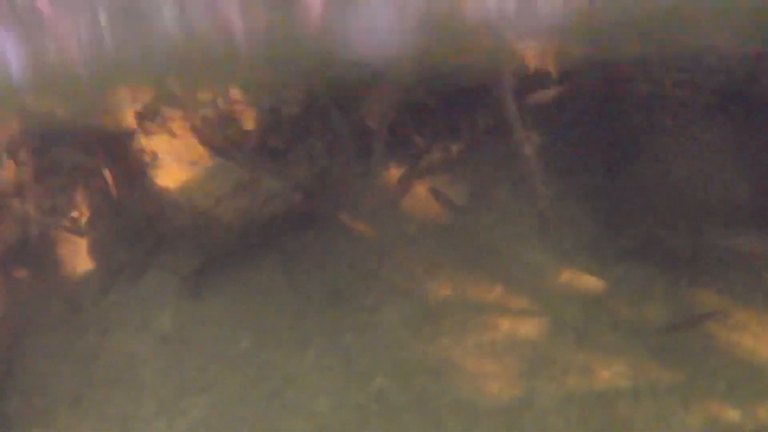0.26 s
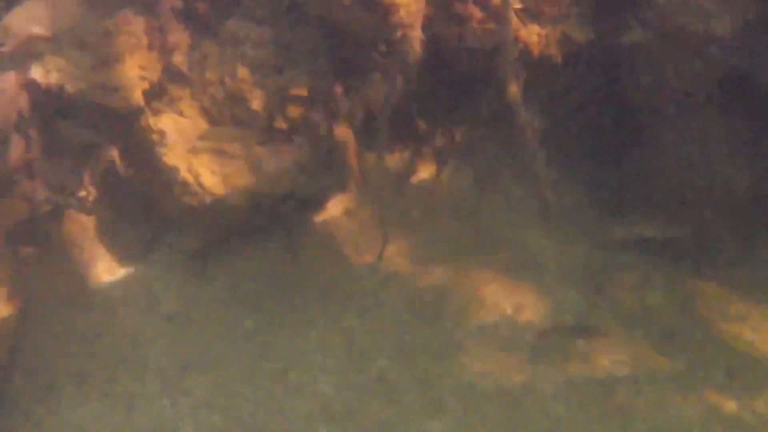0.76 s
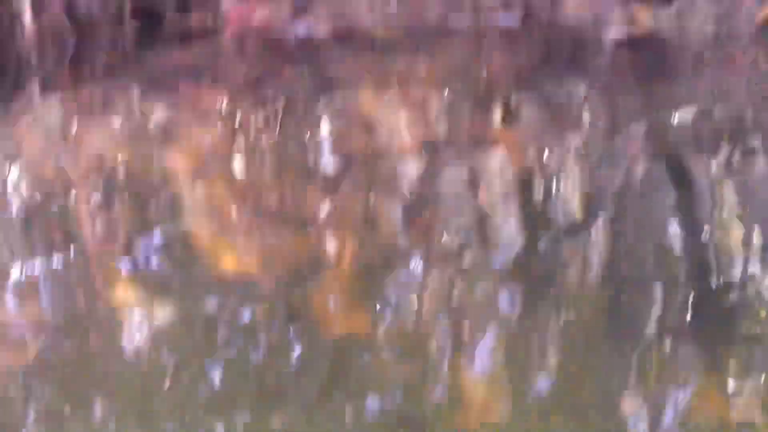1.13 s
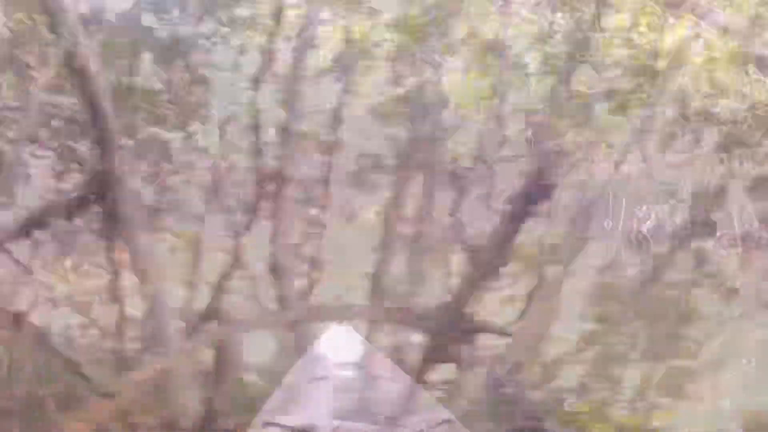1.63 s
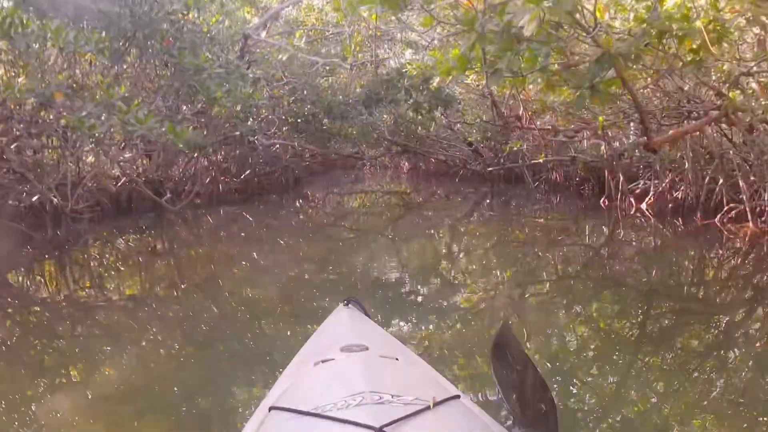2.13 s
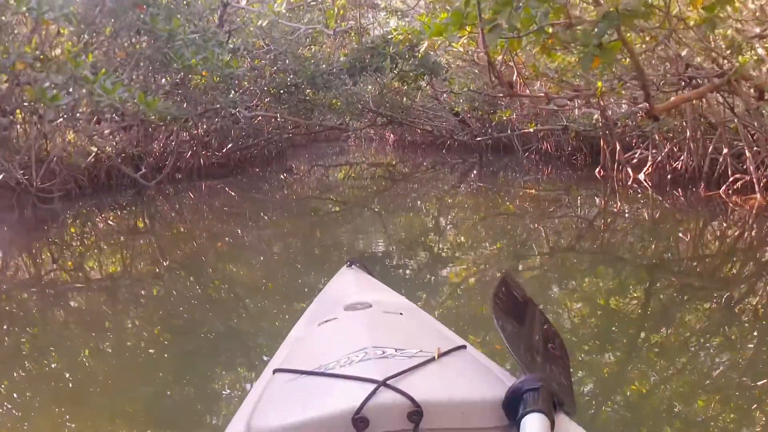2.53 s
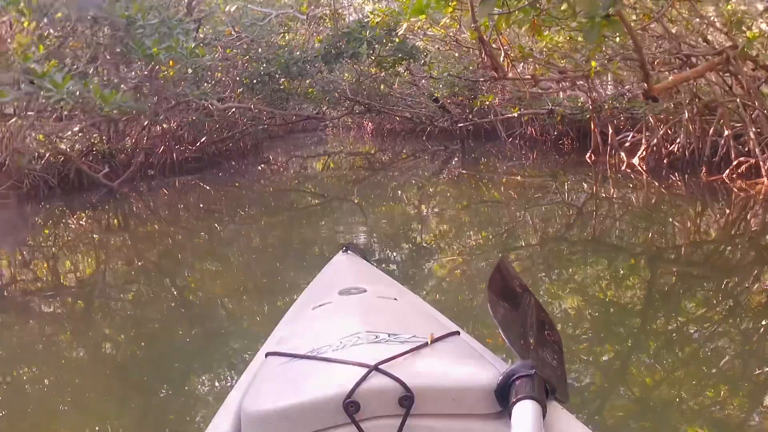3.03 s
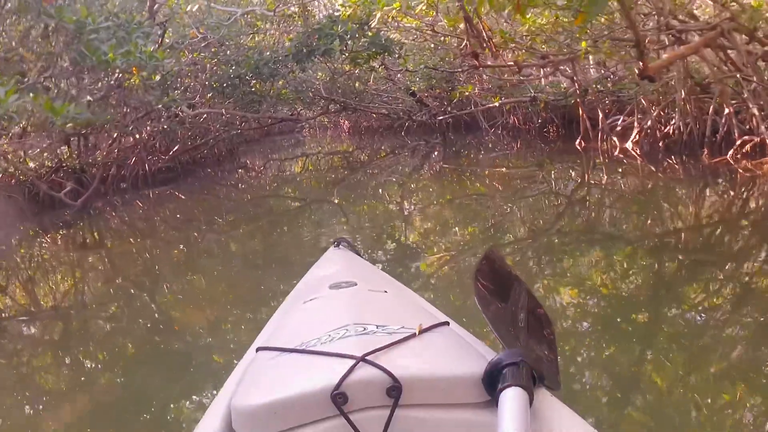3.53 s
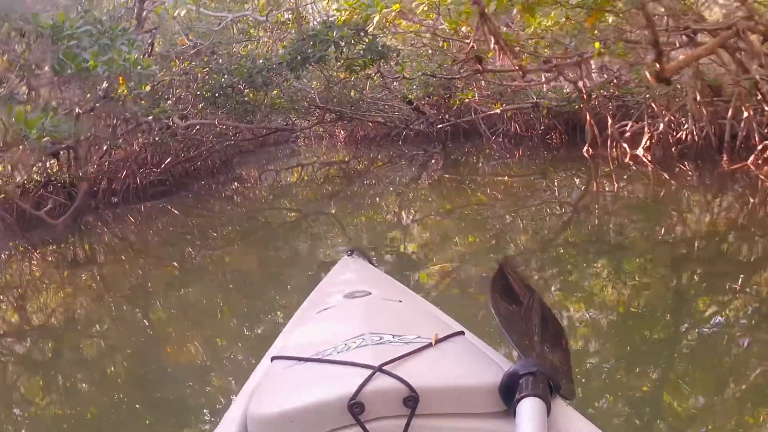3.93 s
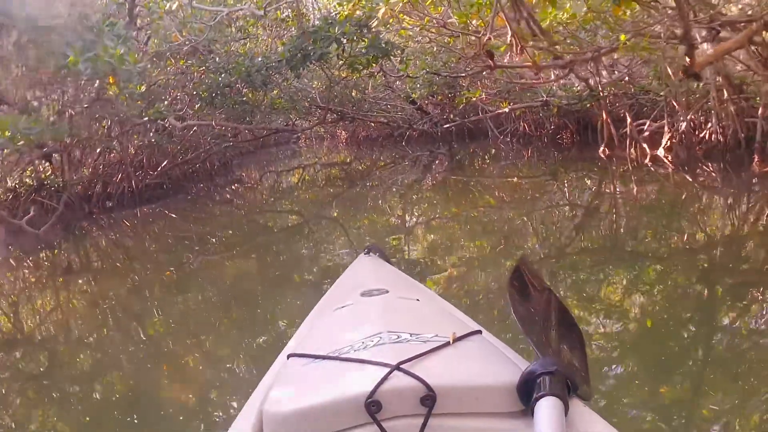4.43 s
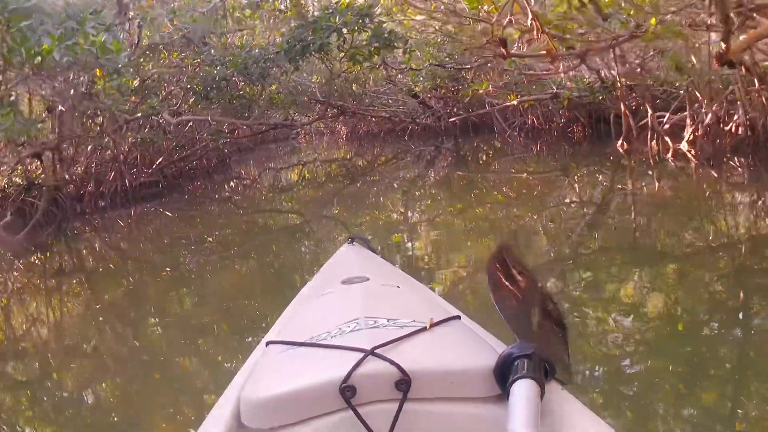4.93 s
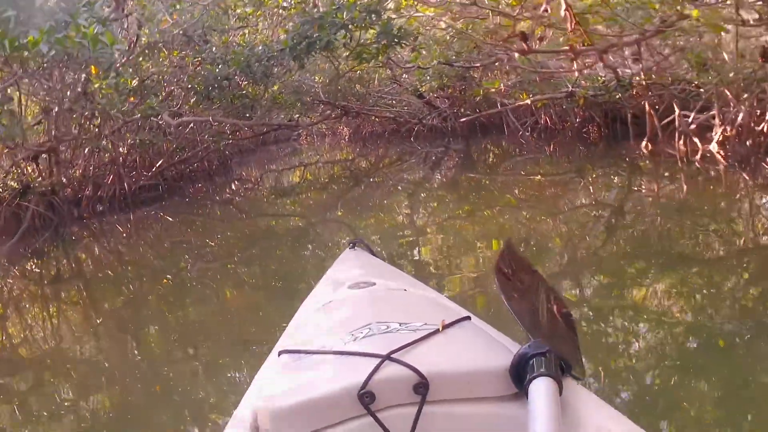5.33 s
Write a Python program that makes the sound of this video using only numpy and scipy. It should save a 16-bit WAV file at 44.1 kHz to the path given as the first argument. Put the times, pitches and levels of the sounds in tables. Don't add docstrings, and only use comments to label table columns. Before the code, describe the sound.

A camera in a sealed plastic housing is handled in still water beside a kayak. Low wobbling rumble and dull thumps thicken over the first second, with small drips and finger ticks. At about 1.3 seconds suction releases in a hard, clipped knock. Wet slaps and taps follow until two seconds, then quiet hiss, faint lapping and a far motor hum, with a few finger rubs near the end.

```python
import sys
import numpy as np
from scipy import signal
from scipy.fft import rfft, irfft
from scipy.io import wavfile
from scipy.ndimage import uniform_filter1d

SR = 44100
rng = np.random.default_rng(int(sys.argv[2]) if len(sys.argv) > 2 else 0)


def invert_db(level):
    return 10 ** (np.asarray(level, dtype=float) / 20)


def int16_out(signal):
    q = np.round(np.clip(np.atleast_2d(signal).T, -1, 1) * 32767)
    wavfile.write(sys.argv[1], SR, q.astype(np.int16))


N = 245195
TIME_S = np.arange(N) / SR
KNOCK_S = 1.2872

# pitch_hz, density_db [dB per Hz]
HISS_SPECTRUM = [(150, -34), (250, -4.5), (282, -3.5), (627, -7.5), (720, -8), (1300, -12.5), (2880, -17.5),
                 (3140, -18), (14700, -25), (15800, -5)]
# pitch_hz, density_db [dB per Hz]
LAPPING_SPECTRUM = [(50, -1.5), (100, 5), (200, 2), (260, -14.5), (400, -17.5)]
# start_s, pitch_hz
MOTOR_PITCH_CURVE = [(2.02, 175.6), (2.94, 175.6), (3.44, 176.8), (3.65, 180.4), (4.42, 180.9),
                     (4.55, 175.2), (4.72, 172)]
# start_s, end_s, pitch_hz, level_db, octave_overtone_db
MOTOR_NOTES = [
    (1.62, 1.74, 183, -44, -36),
    (2.2, 5.4, 112, -56, -10.5),
    (4.85, 5.15, 176, -57.5, -32),
]
# pitch_hz, density_db [dB per Hz]
TREMOR_SPECTRUM = [(2.4, -21), (4.0, 5), (16, 1.5), (23, -1.5), (30, -16), (43, -24), (50, -38), (65, -80),
                   (110, -120)]
# peak_s, level_db
ARM_SWAYS = [(0.15, -29), (0.4, -30), (0.68, -21), (0.881, -19), (1.05, -8), (1.188, -11.5), (1.372, -17.5),
             (1.55, -23), (1.79, -20.5), (1.9, -22.5), (2.03, -26.5), (2.21, -20), (2.46, -23),
             (2.62, -28.5), (2.8, -24), (2.95, -37), (3.1, -30), (3.41, -22), (3.64, -28), (3.78, -35),
             (3.93, -35), (4.19, -33), (4.37, -39), (4.491, -23), (4.71, -31), (4.87, -24), (5.0, -28),
             (5.26, -40), (5.399, -37), (5.51, -39)]
# pitch_hz, density_db [dB per Hz]
SLOSH_SPECTRUM = [(24, -8), (40, 1), (81, -11), (157, -19.5), (244, -21), (292, -27), (423, -32.5),
                  (628, -66), (700, -63), (910, -63.5), (1540, -120)]
# start_s, slosh_db
HOUSING_MOTION = [(0.0, -33), (0.08, -33), (0.15, -44.5), (0.5, -45.5), (0.62, -31), (0.8, -38.5),
                  (0.88, -28.5), (1.05, -26), (1.25, -29), (1.3, -23), (1.38, -34.5), (1.48, -38.5),
                  (1.56, -37), (1.9, -45.5), (2.05, -39.5), (2.3, -48.5), (4.0, -46.5), (5.56, -51)]
# pitch_hz, level_db, t60_s
SHELL_MODES = [(205, -14.5, 0.11), (393, 3, 0.029), (462, -6, 0.092), (855, -5, 0.35), (1040, -3, 0.13),
               (1410, 3, 0.06), (1620, -22.5, 0.015), (1854, -3, 0.053), (2200, 11, 0.016),
               (2600, -25, 0.045), (3350, 1.5, 0.015), (4390, -16.5, 0.091), (5600, -39.5, 0.011)]
# start_s, length_s, level_db
FINGER_STROKES = [(0.045, 0.21, -69), (0.58, 0.42, -65), (0.97, 0.4, -59.5), (1.338, 0.11, -58.5),
                  (1.508, 0.11, -54), (1.62, 0.076, -59.5), (1.714, 0.15, -57), (1.904, 0.29, -64.5),
                  (4.66, 0.25, -62.5), (4.893, 0.144, -59.5), (5.046, 0.11, -59.5), (5.169, 0.19, -58.5),
                  (5.397, 0.12, -65.5)]
# start_s, peak_db, ringing_spot_hz, contact_ms
FINGER_TICKS = [(0.064, -38.5, 820, 7.2), (0.147, -46, 774, 3.5), (0.175, -42, 910, 2.9),
                (0.604, -46.5, 770, 3), (0.726, -45, 880, 2.8), (0.842, -41, 854, 6.2),
                (0.893, -46, 790, 5.5), (1.008, -41, 825, 8.6), (1.189, -31, 1040, 1.8),
                (1.239, -50, 960, 4), (1.27, -38, 847, 18), (1.357, -41, 920, 8.7), (1.377, -40.5, 885, 11),
                (1.407, -42, 920, 4), (1.509, -33.5, 890, 5.6), (1.558, -41, 860, 3.7),
                (1.596, -35.5, 1410, 3.2), (5.31, -39.5, 960, 6), (1.842, -42.5, 1460, 7.1),
                (1.855, -48, 1430, 4.4), (1.936, -46, 810, 4), (1.968, -35.5, 853, 1.7),
                (2.074, -39, 785, 1.1), (4.799, -45, 775, 11), (4.919, -45.5, 785, 9),
                (4.948, -43, 850, 13), (5.009, -45, 840, 3.1), (5.097, -46, 800, 4.4),
                (5.158, -41, 876, 7.2), (5.3, -38.5, 840, 10)]
# start_s, peak_db, ringing_spot_hz, shell_share_db
SEAL_DROPS = [(0.6998, -52, 2120, -1), (0.9896, -54, 1910, 1), (1.0076, -45, 1250, 8.5),
              (1.1385, -44.5, 1900, 3), (1.1915, -37, 2480, 5.5), (1.2092, -36.5, 1590, -12),
              (1.2394, -42, 3020, 4), (1.2705, -36, 2580, -10), (1.3578, -40.5, 1650, -6),
              (1.3644, -44, 2140, -19), (1.4411, -51, 1690, -3), (1.5958, -42, 1410, 0),
              (1.6, -37.5, 2200, -3), (2.0737, -30, 1620, -6), (2.076, -52, 1040, -15),
              (4.7194, -48.5, 2030, -12), (5.1158, -48, 2200, 0), (5.1632, -48, 2190, -10),
              (5.2071, -40.5, 1410, -8), (2.0735, -40.5, 2520, -11), (5.3103, -42, 1410, -11)]
# start_s, peak_db, ringing_spot_hz, bright_crack_db
PORT_BEADS = [(1.1504, -22.5, 4350, -33), (1.1684, -52, 4300, -10), (1.1896, -28, 3640, 1),
              (1.2266, -36, 4400, -12), (1.229, -40.5, 3060, -23), (1.2394, -51, 5200, 5),
              (1.2514, -37, 3420, -32), (1.27, -42, 3270, -6), (1.475, -51, 3470, -13),
              (1.5984, -45, 2940, -20), (2.159, -52, 3650, -12)]
# start_s, peak_db, centre_hz, contact_ms
WET_SLAPS = [(0.604, -41.5, 650, 3), (1.2262, -46, 5000, 1.5), (1.357, -38, 2200, 4),
             (1.508, -43, 1100, 1.4), (1.593, -30.5, 1530, 6.9), (1.594, -41.5, 4900, 3),
             (1.843, -50, 1880, 2.4), (1.936, -46, 700, 2), (1.968, -47.5, 1210, 2.5),
             (2.0725, -30, 2200, 2.4), (2.073, -32.5, 890, 3.5), (2.0715, -48, 5000, 2),
             (5.206, -46, 2010, 4.3)]
# start_s, peak_db, pitch_hz, deep_thud_share_db
DULL_BUMPS = [(0.065, -30, 130, -9), (0.085, -24, 164, -16), (0.148, -30, 126, -11), (0.598, -19.5, 120, 1),
              (0.633, -24.5, 120, 8), (0.698, -21.5, 147, -27), (0.799, -28.5, 156, 12),
              (0.831, -16.5, 152, -19), (0.883, -23.5, 146, -15), (0.959, -18.5, 113, -12),
              (0.998, -28, 142, -12), (1.071, -20.5, 177, -18), (1.107, -31, 183, -8),
              (1.367, -19.5, 198, -20), (1.504, -30.5, 180, -14), (1.589, -22, 173, -15),
              (1.685, -36, 192, 7.5), (1.857, -36, 162, 5), (1.968, -24, 209, -11), (2.178, -34.5, 113, 5),
              (2.386, -40, 172, 12.5), (2.561, -36, 189, 4), (2.896, -27, 198, -17), (3.649, -29, 145, 2),
              (4.07, -40, 115, 16.5), (5.23, -40, 148, 4)]
# start_s, peak_db, pitch_hz
KNUCKLE_RAPS = [(0.074, -27.5, 282), (0.177, -38.5, 293), (0.225, -43, 404), (0.606, -26, 361),
                (0.838, -29, 304), (0.998, -22.5, 297), (1.11, -27, 310), (1.188, -28, 432),
                (1.363, -28, 373), (1.41, -33.5, 350), (1.519, -43, 316), (1.592, -28.5, 338),
                (1.779, -47, 383), (1.854, -33.5, 394), (1.936, -30.5, 393), (1.968, -27, 470),
                (4.569, -39, 320), (4.773, -42, 466), (5.104, -54, 455)]
# start_s, peak_db
KNOCK_CUSPS = [
    (1.2838, -39),
    (1.2899, -22.5),
    (1.2955, -28),
    (1.2965, -27),
    (1.3058, -36),
]


def rms_one(x):
    return x / np.sqrt(np.mean(x ** 2) + 1e-20)


def peak_one(x):
    return x / np.abs(x).max()


def in_time(curve):
    s, value = np.transpose(curve)
    return np.interp(TIME_S, s, value)


def spell(start, end, rise, fall):
    return np.clip(np.minimum((TIME_S - start) / rise, (end + fall - TIME_S) / fall), 0, 1)


def drift(rate_hz):
    r = np.exp(-80 * np.pi * rate_hz / SR)
    noise = rng.standard_normal(N // 40 + 2002)
    slow = signal.lfilter([1], [1, -2 * r, r * r], noise)[2000:]
    return np.interp(np.arange(N) / 40, np.arange(len(slow)), rms_one(slow))


def coloured(spectrum):
    hz, db = np.transpose(spectrum)
    grid = np.arange(1, N // 2 + 2) * SR / N
    gain = invert_db(np.interp(np.log(grid), np.log(hz), db, left=-90, right=-90))
    return rms_one(irfft(gain * rfft(rng.standard_normal(N)), N))


def even(x, window_s):
    window = int(window_s * SR)
    power = uniform_filter1d(uniform_filter1d(x ** 2, window), window)
    return x / np.sqrt(power + .02)


def ring(force, hz, t60):
    r, w = invert_db(-60 / (t60 * SR)), 2 * np.pi * hz / SR
    return signal.lfilter([0, np.sin(w)], [1, -2 * r * np.cos(w), r * r], force + 1e-18)


def add(out, piece, s):
    at = round(s * SR)
    out[at:at + len(piece)] += piece[:N - at]


def hiss():
    duck = spell(KNOCK_S, 1.97, rise=0.099, fall=0.27)
    return invert_db(-57 - 2 * duck) * coloured(HISS_SPECTRUM)


def lapping():
    return invert_db(-57 + 2.0 * drift(10)) * coloured(LAPPING_SPECTRUM)


def drone(start, end, hz, db, overtone_db):
    wander = 0.002 * drift(1.2) + 0.0033 * drift(5.9)
    phase = 2 * np.pi * np.cumsum(hz * (1 + wander)) / SR
    tone = np.sin(phase) + invert_db(overtone_db) * np.sin(2 * phase)
    waver = invert_db(1.3 * drift(8))
    return np.sqrt(2) * spell(start, end, 0.058, 0.015) * waver * invert_db(db) * tone


def motor():
    main = drone(1.96, 4.73, in_time(MOTOR_PITCH_CURVE), -49.5, overtone_db=-31)
    return main + sum(drone(*note) for note in MOTOR_NOTES)


def tremor():
    still_db, sway_s = -31, 0.059
    level = invert_db(still_db) + sum(invert_db(db) * np.exp(-((TIME_S - s) / sway_s) ** 2) for s, db in ARM_SWAYS)
    braced = 1 - .9 * np.exp(-((TIME_S - KNOCK_S - .025) / .045) ** 4)
    return braced * level * even(coloured(TREMOR_SPECTRUM), 0.37)


def slosh():
    return invert_db(in_time(HOUSING_MOTION) - 1.0 + 1.6 * drift(15.0)) * coloured(SLOSH_SPECTRUM)


def rubbing():
    clicks_per_s = 3500 * invert_db(1.5 * drift(30))
    sizes = invert_db(4.2 * np.minimum(rng.exponential(1, N), 4)) * rng.choice([-1, 1], N)
    clicks = sizes * (rng.random(N) < clicks_per_s / SR)
    rings, sizzle = np.zeros(N), np.zeros(N)
    for hz, db, t60 in SHELL_MODES[1:10]:
        flicker = np.clip(2.5 * drift(25), -4, 4)
        rings += invert_db(db + flicker) * ring(clicks, hz, 0.19 * t60)
    rings = signal.sosfilt(signal.butter(1, 1100, fs=SR, output="sos"), rings)
    for hz, db, t60 in SHELL_MODES[10:12]:
        sizzle += invert_db(db + 1.5 * drift(15)) * ring(clicks, hz, 0.3 * t60)
    edge_s = 0.018
    level = sum(invert_db(db) * spell(s, s + length, edge_s, edge_s) for s, length, db in FINGER_STROKES)
    return invert_db(3.5) * level * (rms_one(rings) + invert_db(-13) * rms_one(sizzle))


def ticks(table, cycles, shell_db=-8.0, crack_db=-29.0, contact_ms=2.2, splash=0.72, own=None):
    out, t = np.zeros(N), np.arange(4000) / SR
    bright = signal.butter(1, [4500, 11000], "band", fs=SR, output="sos")
    broad = signal.butter(1, [800, 3200], "band", fs=SR, output="sos")
    touch = np.exp(-((t - .0008) / .00004) ** 2)
    for s, db, hz, trait in table:
        hit = {"shell": shell_db, "crack": crack_db, "contact": contact_ms, own: trait}
        fade = np.exp(-1000 * t / np.clip(hit["contact"], .3, 20))
        force = rng.standard_normal(4000) * np.minimum(t / 0.00097, 1) * fade
        spot = ring(ring(force, hz, cycles / hz), hz, 9 / hz)
        blow = 0.58 * force + touch
        shell = sum(invert_db(d + 2.0 * rng.standard_normal()) * ring(blow, f, .5 * t60)
                    for f, d, t60 in SHELL_MODES[2:])
        splat = invert_db(-12.5) * peak_one(signal.sosfilt(broad, force))
        crack = peak_one(signal.sosfilt(bright, force))
        sound = peak_one(spot) + splash * splat
        sound += invert_db(hit["shell"]) * peak_one(shell) + invert_db(hit["crack"]) * crack
        add(out, invert_db(db - 3.0) * sound, s)
    return out


def beads():
    return ticks(PORT_BEADS, cycles=46.0, shell_db=-9.0, contact_ms=2.06, splash=0.22, own="crack")


def drops():
    return ticks(SEAL_DROPS, cycles=25.0, crack_db=-37.0, contact_ms=2.76, own="shell")


def slaps():
    return ticks(WET_SLAPS, cycles=3.6, shell_db=-24.0, crack_db=-32.0, splash=.2, own="contact")


def finger_ticks():
    return ticks(FINGER_TICKS, cycles=15.0, shell_db=-6.0, splash=0.3, own="contact")


def bumps():
    out, t = np.zeros(N), np.arange(9000) / SR
    push = t * np.exp(-t / 0.00056)
    shell = peak_one(sum(invert_db(d) * ring(push, f, 0.77 * t60) for f, d, t60 in SHELL_MODES[:3]))
    thud = peak_one(ring(push, 65.4, 0.1))
    hits = [(*row, 0.09) for row in DULL_BUMPS]
    hits += [(*row, -25, 0.044) for row in KNUCKLE_RAPS]
    for s, db, hz, thud_db, t60 in hits:
        body = peak_one(ring(push, hz, t60)) + invert_db(-9.5) * shell
        add(out, -invert_db(db - 3.5) * (body + invert_db(thud_db) * thud), s)
    add(out, -invert_db(-28) * (t[:200] / .0045) ** 2, N / SR - .0045)
    return out


def cusps():
    return -sum(invert_db(db) * np.exp(-np.abs(TIME_S - s) / .00004) for s, db in KNOCK_CUSPS)


def knock():
    t = TIME_S - KNOCK_S
    after = np.maximum(t, 0)
    pull = -1.52 * np.exp(-(np.maximum(-t, 0) / .0059) ** 1.4)
    swing = .97 * np.sin(2 * np.pi * 19 * (after - .0015)) * np.exp(-after / .031)
    release = -.6 * np.exp(-after / .002)
    shell = -.75 * np.cos(2 * np.pi * 191 * after) * np.exp(-after / .0175)
    overtone = invert_db(-21.0) * np.sin(2 * np.pi * 300 * after) * np.exp(-after / 0.026)
    return np.where(t < 0, pull, swing + release + shell + overtone)


def scene():
    settle = np.minimum(TIME_S / .03, 1)
    background = hiss() + lapping() + motor()
    handling = settle * (tremor() + slosh()) + rubbing()
    contacts = beads() + drops() + slaps() + finger_ticks() + bumps()
    return (background + handling + contacts + cusps() + knock())[None]


def roll_off(x):
    return signal.sosfilt(signal.butter(12, 16430, fs=SR, output="sos"), x)


def record(dry):
    overload = .937
    clipped = np.clip(dry, -overload, overload)
    top_cut = signal.cheby2(10, 60, 16400, fs=SR, output="sos")
    mix = signal.sosfilt(top_cut, clipped)
    return roll_off(mix)


dry = scene()
out = record(dry)
int16_out(out)
```